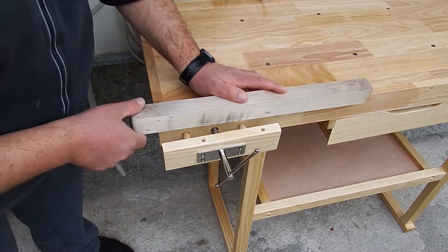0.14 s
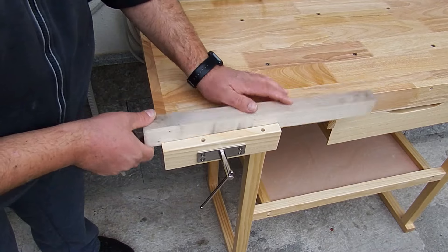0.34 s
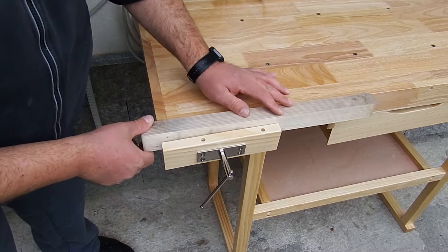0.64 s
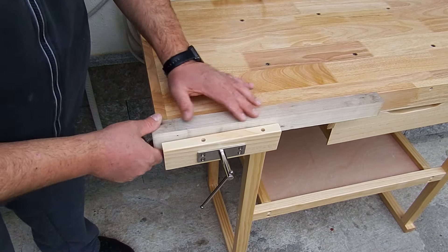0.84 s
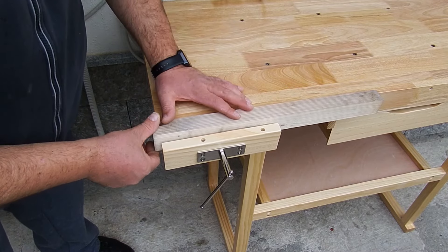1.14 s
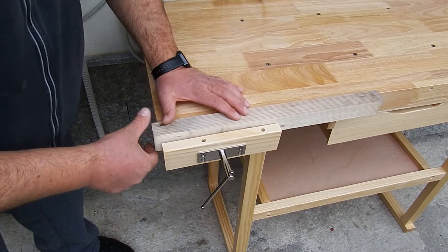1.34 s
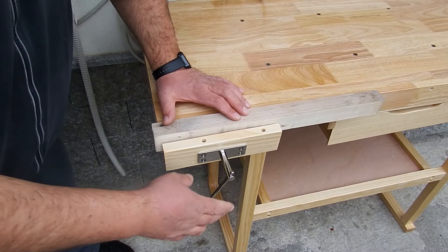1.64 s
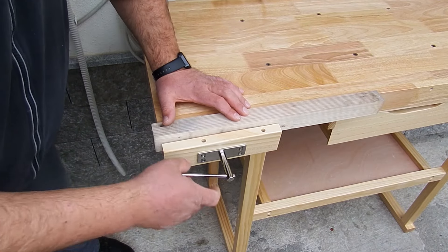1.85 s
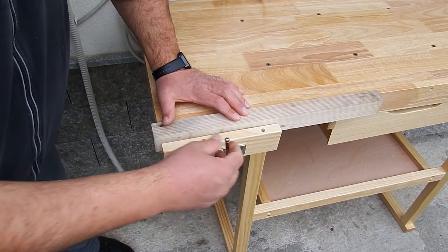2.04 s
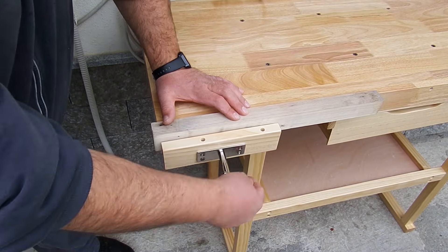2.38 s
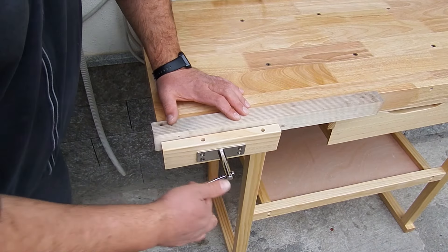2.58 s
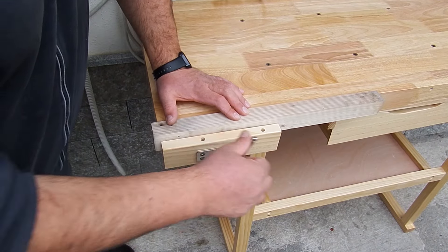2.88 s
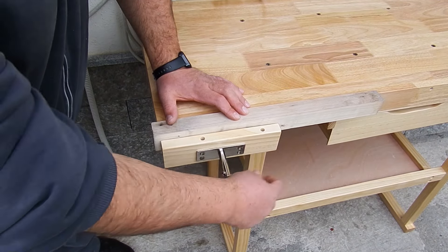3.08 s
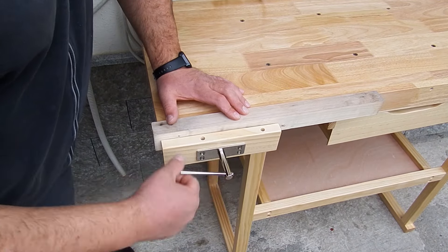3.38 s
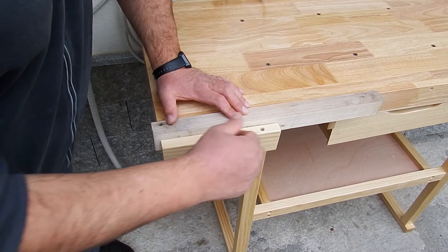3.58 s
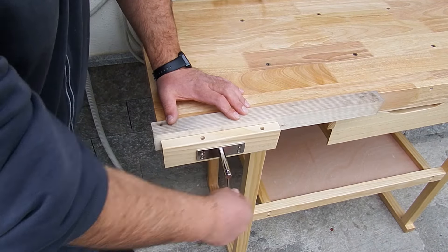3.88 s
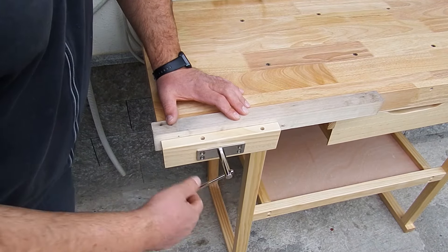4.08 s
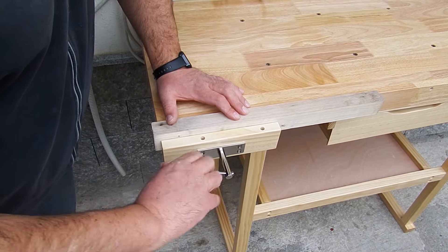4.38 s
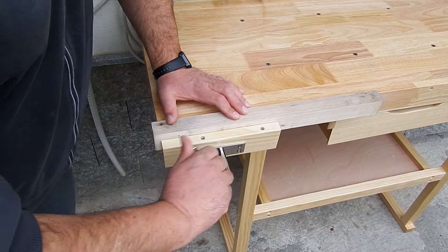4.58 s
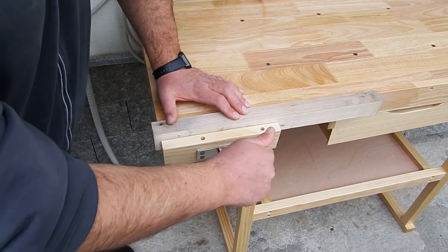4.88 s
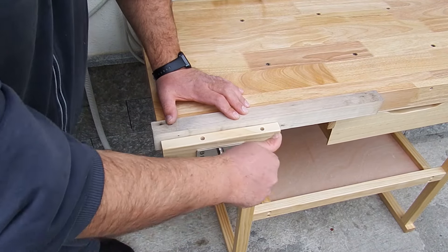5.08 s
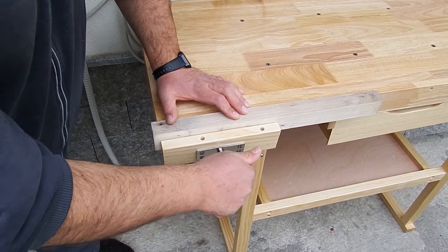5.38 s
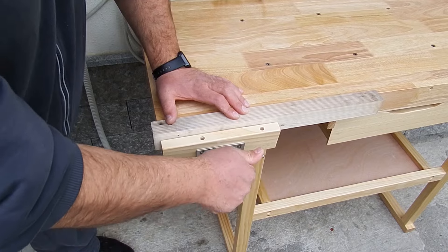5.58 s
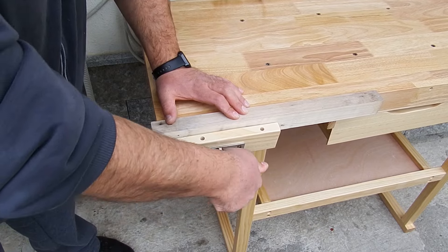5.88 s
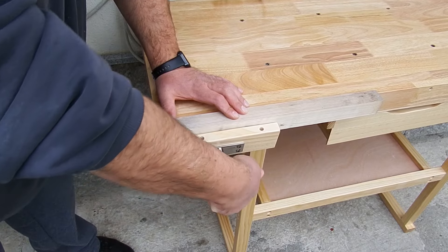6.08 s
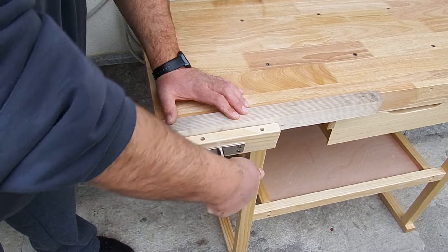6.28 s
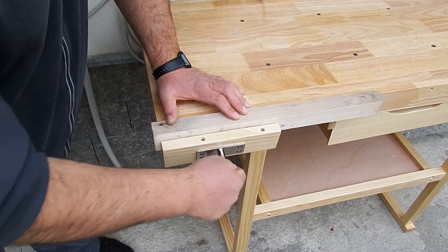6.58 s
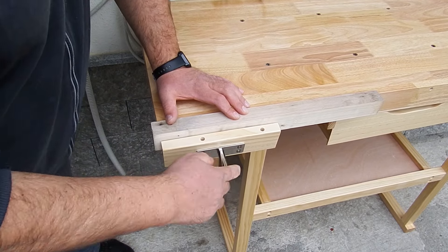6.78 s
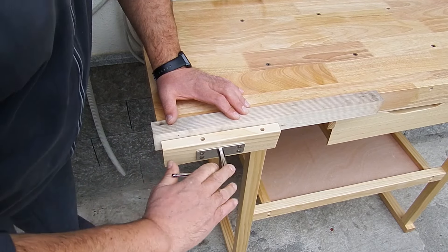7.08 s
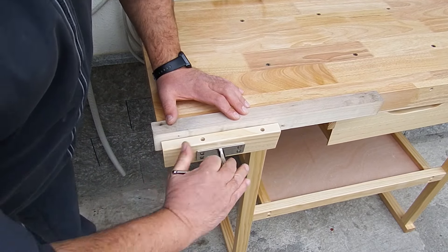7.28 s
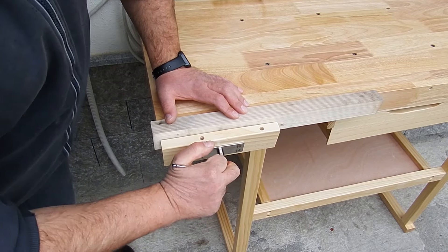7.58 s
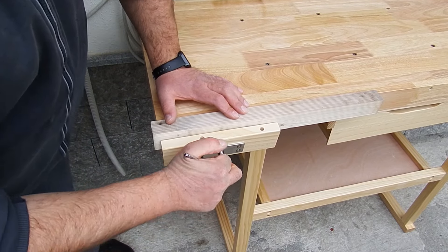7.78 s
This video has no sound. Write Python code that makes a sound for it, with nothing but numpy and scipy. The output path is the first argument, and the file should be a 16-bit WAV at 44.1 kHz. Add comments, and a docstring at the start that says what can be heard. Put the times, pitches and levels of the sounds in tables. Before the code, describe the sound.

Close to a wooden workbench in a hard-walled yard, a bar scrapes and drops into a vise with a cluster of loud knocks. After a lull, the steel screw is cranked with irregular clicks, rattles and light rubbing. A metallic double clack follows, then gritty creaks and a brief groan as it tightens. A dull close microphone adds soft hiss and faint street murmur.

```python
"""Bench vise cranked tight in a yard

A wooden bar is slid and dropped into a bench vise; a hand cranks the steel screw, whose loose handle
rattles, then wrenches it tight in creaking jerks. Noise forces for blows, rubbing and scrapes drive the
resonances of bench top, jaw, screw and handle; gliding tones groan, noise bands whine, sines ring the rod.
A dull microphone listens from close by, with early reflections and echo off hard walls, a street murmur and hiss.
"""
import sys
import numpy as np
from scipy import signal
from scipy.fft import rfft, irfft, next_fast_len
from scipy.io import wavfile
from scipy.ndimage import map_coordinates

SR = 44100
rng = np.random.default_rng(int(sys.argv[2]) if len(sys.argv) > 2 else 0)


def dump_mix(stems):
    """Bounce the given channels to the path in sys.argv[1] as a 16-bit WAV at rate SR."""
    frames = np.atleast_2d(stems).T  # one column per channel
    limited = np.clip(frames, -1, 1)  # hard clip at full scale
    pcm = np.round(limited * 32767).astype(np.int16)
    wavfile.write(sys.argv[1], SR, pcm)


N = 350154

# resonances of the wooden bench top: (frequency [Hz], width [Hz], relative level [dB])
BENCH_TOP_MODES = [(131, 55, -1), (280, 33, -3), (396.8, 25, 4.5), (500, 27, -5.5), (581.6, 45, 1),
                   (698, 33, 0.5), (828.4, 34, 1), (934, 33, -2), (1054, 40, 2.5)]
# resonances of the vise jaw: (frequency [Hz], width [Hz], relative level [dB])
JAW_MODES = [(1293, 130, 11.2), (1441, 90, 8.5), (1585, 92, 11.9), (1846, 100, 9.7), (2127, 140, 8.2),
             (2370, 100, 7), (2550, 80, 6.4), (2775, 130, 2.4)]
# colour of the dull microphone: (frequency [Hz], gain [dB])
MIC_COLOUR = [(30, -29.5), (140, -13.5), (225, -6.5), (300, 6.5), (1000, 5), (1100, -8), (1200, -4),
              (4500, 2.5), (6400, -21), (9000, -17), (17000, -37)]
# the steel handle slides through and slams on its stop: (time [s], jaw level [dB], jaw rattle t60 [s])
HANDLE_CLACKS = [(4.9903, -17.5, 0.1), (5.0449, -17.5, 0.061)]


def amp(db):
    """Converts dB to gain."""
    return 10 ** (np.asarray(db) / 20)


def unit(x):
    """Scales a signal to rms 1."""
    return x / np.sqrt(np.mean(x ** 2) + 1e-20)


def along(points, hz):
    """Reads a curve of (Hz, value) points on a log frequency axis."""
    point_hz, values = np.transpose(points)
    return np.interp(np.log(hz + 1), np.log(point_hz + 1), values)


def filtered(x, gain, causal=False):
    """Filters x by a gain over frequency: zero phase, or minimum phase if causal."""
    size = 2 * next_fast_len(N // 2 + SR // 2)
    response = gain(np.fft.rfftfreq(size, 1 / SR))
    if causal:
        # folding the cepstrum onto positive time gives minimum phase
        cepstrum = irfft(np.log(response + 1e-6), size)
        cepstrum[1:size // 2] *= 2
        cepstrum[size // 2 + 1:] = 0
        response = np.exp(rfft(cepstrum))
    return irfft(rfft(x, size) * response, size)[..., :N]


def wobble(rate):
    """Draws a smooth random curve with rate knots a second."""
    knots = rng.standard_normal(int(N * rate / SR) + 4)
    return map_coordinates(knots, [np.arange(N) * rate / SR])


def add(force, s, x):
    """Adds x to the four-part force from second s on."""
    force[:, round(s * SR):][:, :x.shape[1]] += x


def yard():
    """The far street murmurs steadily, its two channels less alike in some bands than others."""
    # murmur as the microphone passes it: (frequency [Hz], relative level per Hz [dB])
    murmur_colour = [(35, -75), (60, -57), (151, -12), (240, -19.5), (367, -7), (606, -3.5), (874, -9),
                     (1100, -19.5), (1330, -8.5), (4000, -17.5), (6000, -40.5), (7800, -34.5),
                     (13200, -120)]
    # left-right likeness of the murmur: (frequency [Hz], correlation [-1 to 1])
    likeness = [(60, 0.76), (3000, 0.25), (6000, 0.42)]

    def mid_side_gain(hz):
        # mid is cos, side is sin, so left and right correlate by cos(2 * angle)
        angle = np.arccos(np.clip(along(likeness, hz), -1, 1)) / 2
        return amp(along(murmur_colour, hz)) * [np.cos(angle), np.sin(angle)]

    mid, side = filtered(rng.standard_normal((2, N)), mid_side_gain)
    level = amp(-61.5 + 2.5 * wobble(2.64))
    return level * unit(np.array([mid + side, mid - side]))


def preamp_hiss():
    """The preamplifier hisses with coloured noise, spread wide over both channels."""
    # hiss colour: (frequency [Hz], relative level per Hz [dB])
    hiss_colour = [(30, -54), (300, -15.5), (5000, 1.5), (14000, -3), (15600, -7), (15900, -45.5)]
    a, b = filtered(rng.standard_normal((2, N)), lambda hz: amp(along(hiss_colour, hz)))
    return amp(-68.5) * unit(np.array([a + 1.2 * b, a - 1.3 * b]))


def walls(x):
    """Hard walls echo x with noise that dies at its own speed at each frequency."""
    # echo decay: (frequency [Hz], t60 [s])
    echo_decay = [(200, 0.55), (500, 0.61), (1500, 0.26), (4000, 0.35), (10000, 0.25)]
    hz, t, z = signal.stft(rng.standard_normal((2, SR // 2)), SR, nperseg=256)
    # the two close ports share the echo less in the treble
    side_db = along([(300, -25.0), (3000, -22), (5000, -3.5)], hz)
    z[1] *= amp(side_db)[:, None]
    decay = amp(-60 * t / along(echo_decay, hz)[:, None])
    mid, side = signal.istft(z * decay, SR, nperseg=256)[1]
    tail = np.array([mid + side, mid - side]) / np.linalg.norm(mid)
    delayed = np.pad(x, (300, 0))
    return signal.fftconvolve(delayed[None], tail, axes=1)[:, :N]


def ringing(force, modes):
    """A part's resonances colour its force; white force of rms 1 reaches the microphone at rms 1."""
    def gain(hz):
        power = 0
        for centre, width, db in modes:
            damping = (hz * width) ** 2
            power = power + amp(db) ** 2 * damping / ((centre * centre - hz * hz) ** 2 + damping)
        return np.sqrt(power)

    hz = np.linspace(0, SR / 2, 4000)
    heard_rms = np.sqrt(np.mean((gain(hz) * amp(along(MIC_COLOUR, hz))) ** 2))
    return filtered(force, gain, causal=True) / heard_rms


def favour(force, pitches_hz, boost_db, fading=1):
    """The place of a contact drives some resonances harder, in the part that has them."""
    out = force.copy()
    part_limits_hz = [BENCH_TOP_MODES[-1][0] + 100, JAW_MODES[-1][0] + 250]
    for hz in pitches_hz:
        part = np.searchsorted(part_limits_hz, hz)  # bench top, jaw or screw
        b, a = signal.iirpeak(hz, hz / max(hz / 10, 60), SR)
        part_boost_db = boost_db + (part == 0)  # the bench top gets 1 dB more
        out[part] += amp(part_boost_db) * signal.lfilter(b, a, force[part] * fading)
    return out * (np.std(force, axis=1) / np.std(out, axis=1))[:, None]


def stroke(s, edge, level_db):
    """Gain along one stroke, fading in and out over edge seconds at its ends."""
    t = np.arange(N) / SR
    fade = np.clip(np.minimum(t - s[0] + edge, s[-1] + edge - t) / edge, 0, 1)
    return fade * amp(np.interp(t, s, level_db))


def sing(rows, jitter, flutter_db, rate):
    """Stick-slip locks onto a resonance: rough inharmonic partials glide with the load."""
    s, hz, db = np.transpose(rows)
    pitch = np.interp(np.arange(N) / SR, s, hz) * (1 + jitter * wobble(rate))
    phase = 2 * np.pi * np.cumsum(pitch) / SR
    tone = 0
    for ratio, partial_db in [(1, 1.5), (1.45, -5)]:
        tone = tone + np.sin(ratio * phase) * amp(partial_db + flutter_db * wobble(rate))
    return stroke(s, 0.0073, db) * unit(tone)


def whine(rows, spread_hz):
    """Dry rubbing whines as a fuzzy band of noise around a drifting resonance."""
    s, hz, db = np.transpose(rows)
    pitch = np.interp(np.arange(N) / SR, s, hz)
    carrier = np.sin(2 * np.pi * np.cumsum(pitch) / SR)
    fuzz = wobble(spread_hz) * amp(3.5 * wobble(30))  # broken, not steady
    return stroke(s, 0.02, db) * unit(carrier * fuzz)


def groan():
    """The loaded jaw groans by stick-slip; lighter rubbing gives fuzzier whines."""
    # the loaded jaw sings: (time [s], pitch [Hz], level [dB])
    groan_glide = [(6.49, 731.3, -45), (6.53, 689.8, -23.5), (6.556, 733.6, -34), (6.567, 747.5, -33),
                   (6.578, 728.5, -42.5), (6.62, 624.2, -27.5), (6.655, 612.6, -31.5), (6.69, 676, -43),
                   (6.715, 676, -36.5)]
    # one list per whine on a drifting resonance: (time [s], pitch [Hz], level [dB])
    whine_glides = [
        [(.84, 1600, -52), (.92, 1647, -48), (.98, 1630, -37.5)],
        [(1.498, 4920, -52.5), (1.515, 4700, -58)],
        [(2.93, 1597, -49), (3.0, 2048, -46.5), (3.1, 1856, -49.5), (3.22, 2030, -49), (3.3, 1890, -60)],
    ]
    whines = sum(whine(rows, 600) for rows in whine_glides)
    return sing(groan_glide, 0.045, flutter_db=5, rate=130) + whines


def slips(depth_db, slow, fast):
    """A dense rain of tiny slips drives the four parts; its strength wavers at two speeds."""
    rain = rng.standard_normal((4, N)) * amp(1.5 * rng.exponential(size=N))
    # slips are too quick to rock the legs
    highpass = signal.butter(2, 330, "high", fs=SR, output="sos")
    rain[0] = signal.sosfilt(highpass, rain[0])
    own = np.array([wobble(slow) for _ in rain])
    shared = wobble(slow) + wobble(fast)
    return unit(rain * amp(depth_db * (own + shared)))


def chattering_grit():
    """A loaded thread sticks and lets go, so its gritty slips pulse at an unsteady rate."""
    chatter_hz, chatter_db = 165, 3.5
    grit = slips(1.2, 90, 300)
    rate_hz = chatter_hz * (1 + 0.18 * wobble(40))
    pulse = np.cos(2 * np.pi * np.cumsum(rate_hz) / SR)
    return unit(grit * amp(chatter_db * pulse))


def rub():
    """Light friction is smooth; friction under load is gritty and favours a few resonances."""
    # sliding wood and turning thread:
    # (time [s], jaw level [dB], bench top against jaw [dB], screw against jaw [dB])
    rub_levels = [(0, -45, -2, -2.5), (0.241, -46.5, 5, -8.5), (.64, -54, -6.5, -11), (.95, -56, 9, 10),
                  (1.1, -56.5, -16, -1), (1.3, -76.5, 4, 8), (1.721, -62, -6, -3.5), (1.9, -40.5, -15, -15),
                  (2.05, -51, -12.5, -9), (2.4, -51.5, -0.5, -9), (2.8, -47, 3.5, -12.5),
                  (3, -54.5, -0.5, -9.5), (3.4, -48.5, -4.5, -13.5), (3.7, -57.5, -3.5, -11),
                  (3.85, -51, -4, -12), (4.1, -57, -1.5, -11), (4.28, -53.5, -4.5, -0.5),
                  (4.4, -66.5, 6.5, -4.5), (4.898, -58.5, 0.5, -8), (5.199, -64.5, -4.5, 3.5),
                  (5.899, -71, 6.5, -5), (6.2, -62, -6.5, -4), (6.45, -71, 6, 1.5),
                  (7.002, -75.5, 14.5, 9.5), (7.549, -63.5, -0.5, 1.5), (7.94, -64, -14, -4.5)]
    # hard scrapes under load: (time [s], length [s], jaw level at start [dB], jaw level at end [dB],
    # bench top against jaw [dB], screw against jaw [dB], favoured pitch [Hz], second favoured pitch [Hz])
    scrapes = [(0.258, .11, -30, -40.5, -6, -3.5, 1340, 2680),
               (0.384, 0.054, -33.5, -27.5, -15.5, -1.5, 2640, 2800),
               (3.41, .19, -51.5, -50.5, 1.5, -12, 546, 1330),
               (5.32, 0.044, -27, -33.5, -6, -4, 2750, 4220),
               (5.366, 0.028, -31.5, -30, 0.5, -2, 3720, 2320),
               (5.398, 0.025, -25.5, -41, 2, -32, 1280, 2150),
               (6.475, 0.0503, -52, -28, 2, -8.5, 3480, 900),
               (6.581, 0.0538, -40, -28.5, 1.5, -3, 3530, 2130),
               (6.634, .075, -30, -38, 1.5, 5.5, 3490, 4400), (6.759, 0.012, -20.5, -27, -1, 3, 1400, 2150),
               (7.077, 0.037, -40, -39, 1.5, -2.5, 405, 695), (7.192, 0.017, -44, -50, -3, 0, 3140, 1600)]
    rub_handle_db, scrape_handle_db = -21.5, -22  # the handle shivers with the screw, dB against it
    fade_in_s, fade_out_s = 0.003, 0.005

    t = np.arange(N) / SR
    s, db, top_db, screw_db = np.transpose(rub_levels)
    parts_db = (top_db, 0 * db, screw_db, screw_db + rub_handle_db)
    levels = amp([np.interp(t, s, db + part_db) for part_db in parts_db])
    force = levels * slips(1.6, 20, 110)

    gritty = chattering_grit()
    for s, length, start_db, end_db, top_db, screw_db, *hz in scrapes:
        u = np.arange(round((length + fade_out_s) * SR)) / SR
        fade = np.clip(np.minimum(u / fade_in_s, 1 + (length - u) / fade_out_s), 0, 1)
        level = fade * amp(np.interp(u, [0, length], [start_db, end_db]))
        grit = favour(gritty[:, round(s * SR):][:, :len(u)], hz, boost_db=4)
        part_gains = amp([top_db, 0, screw_db, screw_db + scrape_handle_db])
        add(force, s, grit * level * part_gains[:, None])
    return force


def rod():
    """The free steel rod rings briefly and a little unsteadily after each clack."""
    # the struck handle rings: (frequency [Hz], level against the clack [dB], t60 [s])
    rod_modes = [(2517, -25.5, 0.27), (3690, -21, 0.205), (4340, -15, 0.14), (5760, 5, 0.02),
                 (13000, 7, 0.0088)]
    out = np.zeros(N)
    t = np.arange(SR // 2) / SR
    for s, db, *_ in HANDLE_CLACKS:
        for hz, ring_db, t60 in rod_modes:
            drift = np.cumsum(rng.normal(0, hz / 35000, len(t)))  # the grip of the hand blurs each line
            ring = amp(db + ring_db - 60 * t / t60) * np.sin(2 * np.pi * hz * t + drift)
            out[round(s * SR):][:len(t)] += ring
    return out


def blow(levels_db, hz, rise, click, t60, punch):
    """A blow forces the four parts with a first contact, then a dying rattle of small rebounds."""
    punch_t60_s = 0.012  # the first rebounds of a hard blow are the strongest
    favour_t60_s = 0.084  # later rebounds land elsewhere and lose the favoured pitches
    t = np.arange(SR // 4) / SR
    slowness = np.array([[1.3], [1.], [.9], [.4]])  # heavy wood rattles on longer than light steel
    swell = 1 - np.exp(-(t / rise) ** 2)
    decay = amp(-60 * t / (t60 * slowness))
    rattle = swell * decay * rng.standard_normal((4, len(t)))
    # rebounds are separate grains of 40 samples
    grains = rng.exponential(size=len(t) // 40 + 1).repeat(40)[:len(t)]
    rattle *= amp(2 * grains - 2)
    rattle *= 1 + punch * amp(-60 * t / punch_t60_s)
    rattle[:, 8] += click
    # small parts move little air in the bass
    rattle[1:] = signal.lfilter(*signal.butter(2, 300, "high", fs=SR), rattle[1:])
    fading = amp(-60 * t / favour_t60_s)
    return amp(levels_db)[:, None] * favour(rattle, hz, boost_db=10.5, fading=fading)


def knocks():
    """Hard blows start at once with a click, soft ones swell over milliseconds; the handle clacks."""
    # bar, jaw and thread strike: (time [s], jaw level [dB], bench top against jaw [dB],
    # screw against jaw [dB], favoured pitch [Hz], second favoured pitch [Hz], hardness [0-1])
    blows = [(0.092, -35, -3.5, -6.5, 2610, 392, 0.83), (0.2125, -37.5, -8, -28, 2550, 384, 0.77),
             (0.2501, -26.5, -6, -27, 1230, 2880, 0.86), (0.4223, -11, -6, -2.5, 1790, 830, 0.89),
             (0.4343, -16.5, -13, -3, 2370, 3160, 0.3), (0.471, -12.5, -8, -7.5, 1475, 3090, 0.97),
             (0.528, -13, -3, -8, 2200, 840, 0.92), (0.984, -29, -2.5, -12.5, 2200, 1260, 0.95),
             (1.0046, -29, -12, -8, 2370, 596, 0.89), (1.167, -40, 6.5, -16, 1506, 750, 0.83),
             (1.4443, -45, -1, -24, 740, 1240, 0.69), (1.847, -16, -6.5, -4, 1970, 520, 0.11),
             (1.8951, -19, -6.5, -14.5, 1750, 1040, 0.79), (2.114, -39, -1.5, -13, 590, 2370, 0.86),
             (2.449, -30.5, -6.5, -9.5, 2660, 656, 0.93), (2.5772, -40, -5.5, -10, 1660, 1250, 0.89),
             (2.650, -26, -6, -11, 2570, 1460, 0.97), (2.741, -30, -3.5, -6.5, 1250, 600, 0.9),
             (2.799, -28, -3, -3, 1730, 388, 0.19), (2.862, -26.5, -6, -9, 1620, 1660, 0.14),
             (3.237, -29.5, -10.5, -12.5, 2680, 3220, 0.82), (3.597, -32.5, -1, -11, 1720, 485, 0.041),
             (3.8484, -42, 0.5, -12, 2150, 1020, 0.69), (3.9332, -31, -5.5, -22, 2995, 495, 0.82),
             (3.9818, -51, 8.5, -4, 630, 1300, 1), (4.0071, -43.5, -6, -7, 1310, 1600, 0.96),
             (4.4104, -51.5, 1.5, -24, 1820, 810, 0.94), (5.2898, -30, 1.5, -12.5, 1390, 2270, 0.68),
             (5.376, -32, 3.5, -6, 2300, 500, 0.28), (6.4364, -43, -2.5, -6.5, 1820, 850, 0.54),
             (6.513, -28.5, -2.5, 0.5, 685, 3600, 0.65), (6.670, -25, -27, -1, 3550, 3540, 0.86),
             (6.7121, -19.5, -5, -1.5, 3670, 724, 0.36), (6.741, -17, -8, 1, 1400, 1750, 0.8),
             (7.069, -34.5, 2.5, 0.5, 1830, 400, 0.72), (7.212, -33, 0, -2.5, 1480, 3940, 0.97),
             (7.226, -38.5, 0, -17, 1480, 860, 1), (7.3086, -30, 2.5, -12, 530, 890, 0.54),
             (7.415, -31, 1, -4.5, 1640, 3740, 0.43), (7.774, -42, -4, -10, 1930, 540, 0.97)]
    soft_rise_s, hard_rise_s = 0.008, 0.0007
    jaw_rattle_t60_s = 0.11
    full_punch = 1.1
    # first contact over the rattle: bench top, jaw, screw, handle
    soft_click = np.array([0.33, 1.1, 1.033, 2.0])
    hard_click = np.array([3.5, 6.3, 3.3, 12])
    clack_click = np.array([2.8, 28, 9.6, 10])
    clack_parts_db = np.array([-9.5, -5, -1.5, -13.5])  # added to the clack level, same part order
    clack_hz = [2343, 3510, 860]  # favoured pitches

    force = np.zeros((4, N + SR))
    for s, db, top_db, screw_db, *hz, hard in blows:
        hard = np.clip(hard, 0, 1)
        handle_db = -8.5 + 2.9 * screw_db  # the loose handle rattles more than in step with the screw
        parts_db = np.array([top_db, 0, screw_db, handle_db])
        rise = soft_rise_s + hard * (hard_rise_s - soft_rise_s)
        click = soft_click + hard ** 3 * (hard_click - soft_click)
        add(force, s, blow(db + parts_db, hz, rise, click, jaw_rattle_t60_s, full_punch * hard ** 2))

    # light steel hardly stirs the heavy top
    highpass = signal.butter(2, 650, "high", fs=SR)
    for s, db, t60 in HANDLE_CLACKS:
        clack = blow(db + clack_parts_db, clack_hz, 0.0013, clack_click, t60, full_punch / 2)
        add(force, s, signal.lfilter(*highpass, clack))
    return force[:, :N]


def scene():
    """The vise sounds close by, with its first reflections and its echo."""
    # resonances of the screw: (frequency [Hz], width [Hz], relative level [dB])
    screw_modes = [(3150, 220, 5.5), (3490, 230, 4), (3770, 50, 2.5), (4070, 190, -5), (4470, 200, -3.5),
                   (4900, 140, -10.5), (5000, 610, -3.5)]
    # resonances of the handle: (frequency [Hz], width [Hz], relative level [dB])
    handle_modes = [(8330, 550, 9), (9110, 370, 4), (10400, 1100, 5), (12870, 3000, -23.5)]
    # reflections off floor and near wall: (delay [s], level [dB], left over right [dB])
    reflections = [(.004, -20.5, 9.5), (.008, -13, -1.5), (0.012, -10, 0.5), (.019, -18.5, -1)]

    forces = knocks() + rub()
    part_modes = (BENCH_TOP_MODES, JAW_MODES, screw_modes, handle_modes)
    parts = sum(ringing(force, modes) for force, modes in zip(forces, part_modes))
    vise = parts + groan() + rod()

    dull = signal.lfilter(*signal.butter(1, 6000, fs=SR), vise)  # rough surfaces scatter the treble
    early = np.zeros((2, N))
    for s, db, pan_db in reflections:
        delayed = np.pad(dull, (round(s * SR), 0))[:N]
        early += amp([[db + pan_db / 2], [db - pan_db / 2]]) * delayed
    near = (vise + early) * amp([[-1.75], [-2.25]])  # left, right
    return near + amp(-16.0) * walls(vise)


def record(dry):
    """The microphone colours the scene; murmur, hiss, soft overload and band limits follow."""
    overload_level, rolloff_hz, top_hz = 0.95, 60, 16600
    hiss = preamp_hiss()
    coloured = filtered(dry, lambda hz: amp(along(MIC_COLOUR, hz)), causal=True)
    heard = coloured + yard() + hiss
    heard = heard / (1 + np.abs(heard / overload_level) ** 4) ** 0.25
    return filtered(heard, lambda hz: (hz < top_hz) * hz ** 2 / (hz ** 2 + rolloff_hz ** 2))


dry = scene()
out = record(dry)
dump_mix(out)
```